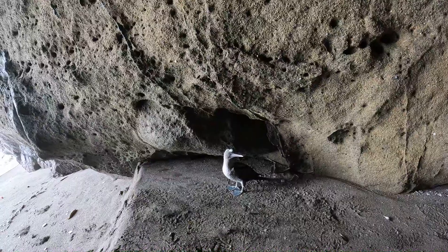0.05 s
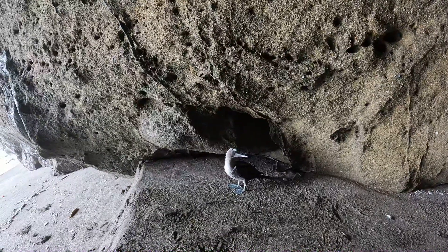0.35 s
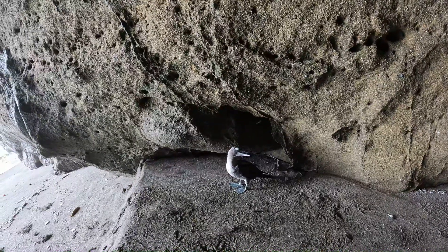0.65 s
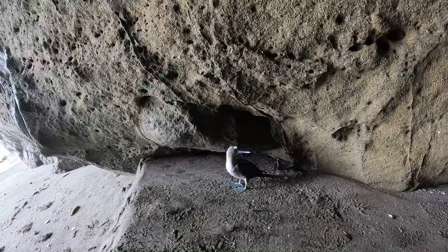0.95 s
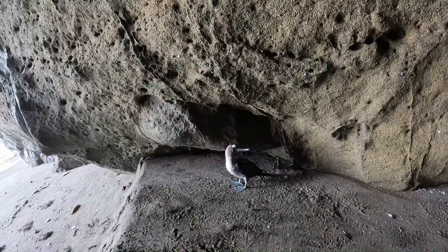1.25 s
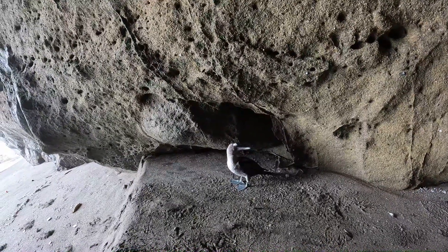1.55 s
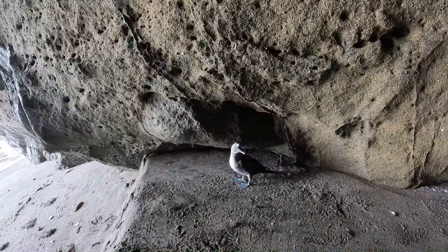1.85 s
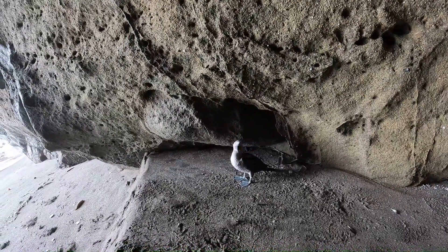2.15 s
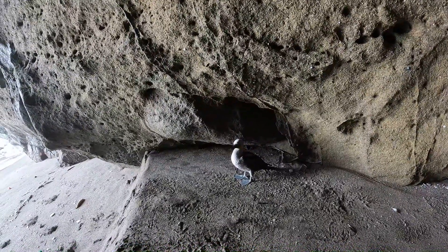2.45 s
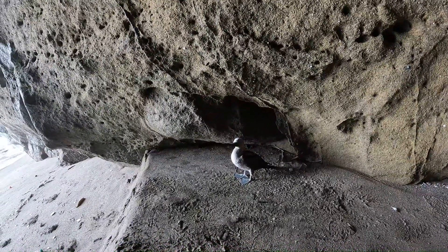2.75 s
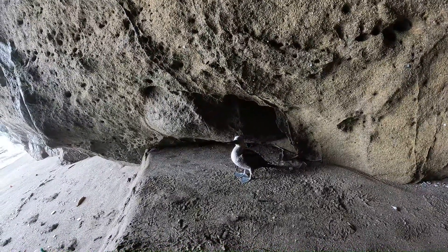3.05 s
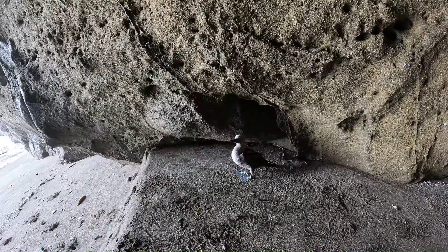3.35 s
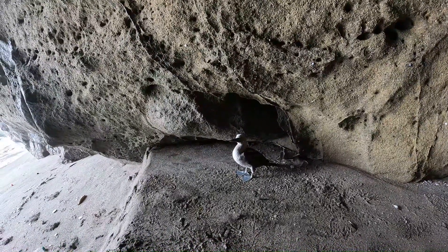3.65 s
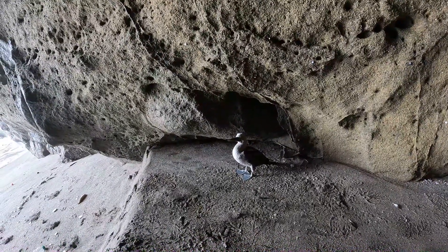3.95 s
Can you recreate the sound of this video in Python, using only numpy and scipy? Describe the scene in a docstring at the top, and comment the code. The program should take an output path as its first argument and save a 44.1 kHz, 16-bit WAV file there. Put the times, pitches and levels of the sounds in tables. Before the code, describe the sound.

Surf washes steadily, heard from inside a sea cave with a low, hollow drone throughout. A breaker's deep rumble is strongest at the start and dies away in lumps over the first second or so. From about 1.5 seconds the next wave's roar slowly swells, with white water and faint foam hiss toward the left, cresting slightly near 2.9 seconds and rising a little again toward 4 seconds.

```python
"""Surf inside a sea cave

Stereo microphone within the cave, the mouth off to the left. The deep boom of a breaker dies away
in lumps while the next wave rolls in: its roar, its white water and the hiss of its foam swell slowly.
Behind them the rock hollow drones with a few broad low resonances."""
import sys
import numpy as np
from scipy import signal
from scipy.fft import rfft, irfft
from scipy.io import wavfile
from scipy.ndimage import uniform_filter1d

SR = 44100
rng = np.random.default_rng(int(sys.argv[2]) if len(sys.argv) > 2 else 0)


def transcribe(signal):
    """Save signal, clipped to [-1, 1], as a 16-bit WAV file at the path in sys.argv[1]."""
    frames = np.atleast_2d(signal).T
    limited = np.clip(frames, -1, 1)
    pcm = np.round(limited * 32767).astype(np.int16)
    wavfile.write(sys.argv[1], SR, pcm)


N = 176400

# The incoming wave, with a small crest near 2.9 s: t/s, roar level/dB, rush level/dB, foam level/dB
WAVE = [(0, -30, -33.5, -38), (0.28, -31.3, -36, -40), (0.5, -31.5, -36, -37.5), (0.7, -32.5, -35, -37),
        (1.12, -31.5, -34, -39.5), (1.4, -30, -33.5, -38), (1.8, -29.2, -33, -37.7),
        (2.15, -27.5, -31.5, -37), (2.5, -28.5, -32, -37), (2.75, -28, -33, -36.5),
        (2.85, -28, -30.5, -35.3), (2.96, -27.5, -30, -36), (3.1, -28, -33.2, -37), (3.42, -30, -31, -36.5),
        (3.57, -26.5, -32, -36.1), (3.72, -27.5, -29.5, -35.4), (3.87, -26, -30.3, -34.1),
        (4, -26, -30, -34.8)]


def boom():
    """Heavy water from the breaker: a deep, lumpy rumble, nearly alike in both channels."""
    lumps = [(0, -17), (0.08, -20), (0.15, -18), (0.3, -18.5), (0.41, -24.5), (0.57, -26), (0.64, -18),
             (0.77, -24), (0.85, -21.5), (0.95, -27), (1.03, -20.5), (1.25, -25), (1.6, -24), (2.03, -25.5),
             (2.16, -20), (2.35, -25), (2.55, -22.5), (2.8, -25), (2.89, -19), (3.0, -24), (3.6, -27),
             (3.92, -21.5)]  # the uneven decay: t/s, level/dB
    spectrum = [(8, -16), (22, -5), (31, -1), (39, 1.5), (50, -1.5), (70, -5), (88, -15)]  # strongest near 40 Hz: f/Hz, level/dB
    return amp(0.5) * envelope(lumps) * wash(spectrum)


def roar():
    """The body of the wave, growing as it rolls in."""
    spectrum = [(230, -19), (285, 1.5), (400, -0.5), (490, -3.5), (700, -5.5), (850, -10), (1100, -25)]  # low mids: f/Hz, level/dB
    return amp(0.56) * envelope(WAVE, column=1) * churn(wash(spectrum), depth_db=0.52)


def rush():
    """White water spills over the front of the wave, left of the microphone."""
    spectrum = [(840, -15), (900, 0), (1200, -2.5), (1600, -6), (2100, -10.5), (3200, -22)]  # upper mids: f/Hz, level/dB
    return amp(0.06) * envelope(WAVE, column=2) * wash(spectrum)


def foam():
    """Countless distant bubbles merge into a smooth hiss."""
    spectrum = [(1400, -8.5), (2200, 1), (3200, 0), (5000, -4), (7300, -8.5), (7900, -12), (8200, -15),
                (11000, -23), (11600, -24), (12100, -20.5), (13300, -32), (15000, -37)]  # treble: f/Hz, level/dB
    return amp(0.04) * envelope(WAVE, column=3) * churn(wash(spectrum), depth_db=0.6)


def cave_drone():
    """Surf keeps the rock hollow sounding; its lower and upper resonances swell separately."""
    modes = [(105, 19, 2), (128.3, 18, 3.2), (156.7, 8.5, 4), (184, 13, 2), (214.7, 35, 3)]  # resonances of the hollow: f/Hz, width/Hz, boost/dB
    low_swell = [(0, -23.5), (0.3, -27.5), (0.85, -29.5), (1.05, -24.5), (1.3, -27.5), (1.5, -25.5),
                 (1.9, -26.5), (2.35, -24), (2.6, -27), (2.82, -27.5), (2.9, -22.5), (3.02, -26),
                 (3.4, -26), (3.55, -23), (3.67, -29), (3.93, -22)]  # rise and fall of the low drone: t/s, level/dB
    low_spectrum = [(70, -8.5), (82, 1.5), (100, -0.5), (135, 0), (152, -4)]  # its colour: f/Hz, level/dB
    upper_swell = [(0, -27.5), (0.4, -28.5), (0.9, -27), (1.22, -29), (1.38, -25), (1.5, -27.5),
                   (1.9, -26.5), (2.14, -23.5), (2.52, -28), (2.9, -23), (3.2, -28), (3.33, -23.5),
                   (3.65, -30), (3.93, -24.5)]  # rise and fall of the hollow roar above it: t/s, level/dB
    upper_spectrum = [(150, -6.5), (165, -1), (200, -1), (262, -1), (290, -12.5)]  # its colour: f/Hz, level/dB
    cave = list(modes) + [(145, 8.4, -6)]  # a narrow notch between two modes
    low = amp(0.65) * envelope(low_swell) * wash(low_spectrum, cave)
    upper = amp(0.23) * envelope(upper_swell) * wash(upper_spectrum, cave)
    return low + upper


def wash(spectrum, resonances=(), skirt_db_per_octave=48):
    """Coloured water noise as it reaches the stereo microphone from the cave mouth."""
    coherence = [(60, .9994), (130, .9992), (230, .995), (450, .95), (850, .75), (1500, .65), (2200, .64),
                 (3400, .5), (5500, .63), (7500, .46), (8800, .24), (10200, .4), (12000, .05)]  # how alike the channels are: f/Hz, coherence/0-1
    balance = [(100, 0.085), (230, 0.34), (550, 2.8), (1300, 4.2), (3300, 4.1), (5200, 2.6), (7500, 5.4),
               (10700, 4.6), (12000, 13.5), (15000, 6.8)]  # the mouth side is louder: f/Hz, left minus right/dB
    left_lead = [(100, 0), (400, 0.13), (1000, -0.2), (2400, -0.72), (3100, -0.4), (4500, 0.21),
                 (7600, 0.43), (10000, 0)]  # how far the left channel leads: f/Hz, phase/rad
    hz = np.fft.rfftfreq(N, 1 / SR)
    left, unrelated = rfft(rng.standard_normal((2, N)))
    alike = np.clip(at_hz(coherence, hz), 0, 1)
    right = (alike * left + np.sqrt(1 - alike ** 2) * unrelated) * np.exp(-1j * at_hz(left_lead, hz))
    side_db = at_hz(balance, hz) / 2
    channels = np.array([left * amp(side_db), right * amp(-side_db)])
    octaves_outside = abs(np.log2((hz + 1) / np.clip(hz + 1, spectrum[0][0], spectrum[-1][0])))
    colour_db = at_hz(spectrum, hz) - skirt_db_per_octave * octaves_outside
    resonance_db = sum(db / (1 + (2 * (hz - f) / width) ** 2) for f, width, db in resonances)
    pair = irfft(channels * amp(colour_db + resonance_db), N)
    return pair / np.std(pair.mean(0))


def churn(sound, depth_db, patch_s=0.085, patch_hz=500):
    """Tumbling water: random patches of the spectrum swell and sink."""
    frame, hop = 512, 128
    spectra = signal.stft(sound, nperseg=frame, noverlap=frame - hop)[2]
    patches = rng.standard_normal(spectra.shape[:0:-1]).T  # frequency by time, shared by both channels
    patches = uniform_filter1d(patches, round(patch_s * SR / hop), axis=1)
    patches = uniform_filter1d(patches, round(patch_hz * frame / SR), axis=0)
    patches /= np.sqrt(np.mean(patches ** 2))
    return signal.istft(spectra * amp(depth_db * patches), nperseg=frame, noverlap=frame - hop)[1][:, :N]


def envelope(table, column=1):
    """Gain at each sample from one dB column of a table over time."""
    rows = np.array(table)
    return amp(np.interp(np.arange(N) / SR, rows[:, 0], rows[:, column]))


def at_hz(table, hz):
    """Reads a table along a log-frequency axis."""
    f, value = np.transpose(table)
    return np.interp(np.log(hz + 1), np.log(f + 1), value)


def amp(db):
    """Decibels to gain."""
    return 10 ** (np.asarray(db) / 20)


def scene():
    """Surf and cave together at the microphone."""
    return boom() + cave_drone() + roar() + rush() + foam()


def record(dry, edge_hz=15300):
    """The recorder's band limit cuts off the top of the hiss."""
    lowpass = signal.firwin(511, edge_hz, window=("kaiser", 9), fs=SR)
    return signal.oaconvolve(dry, lowpass[None], "same")


dry = scene()
out = record(dry)
transcribe(out)
```